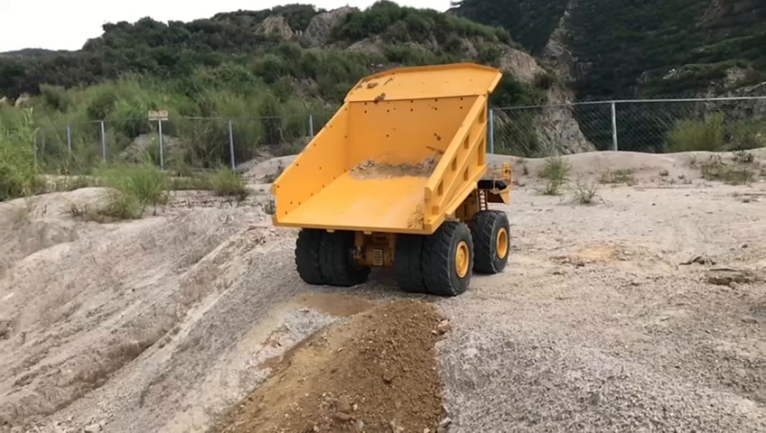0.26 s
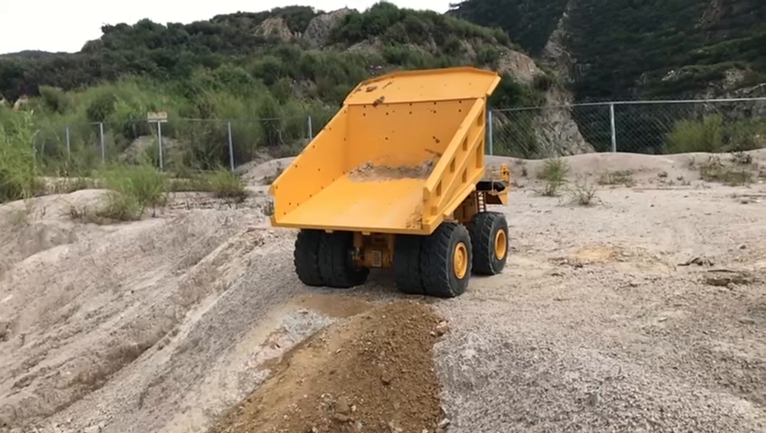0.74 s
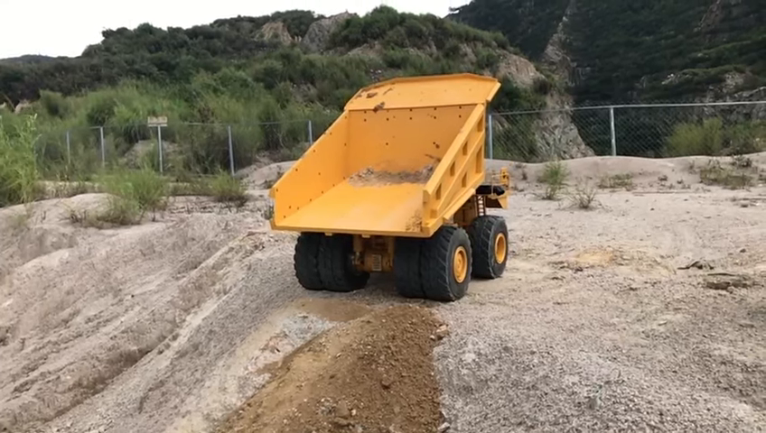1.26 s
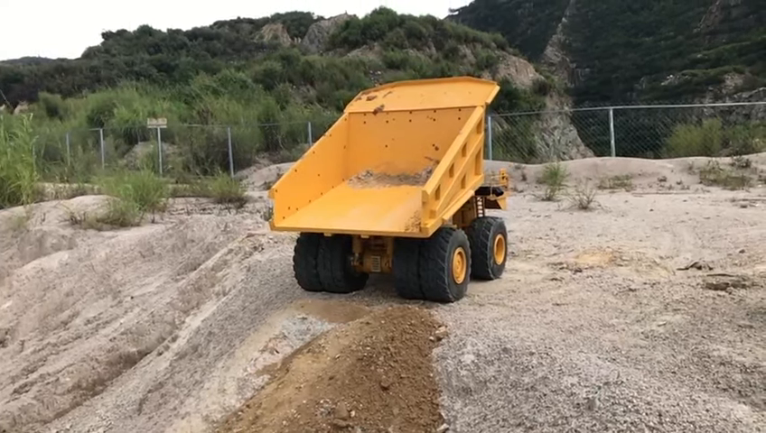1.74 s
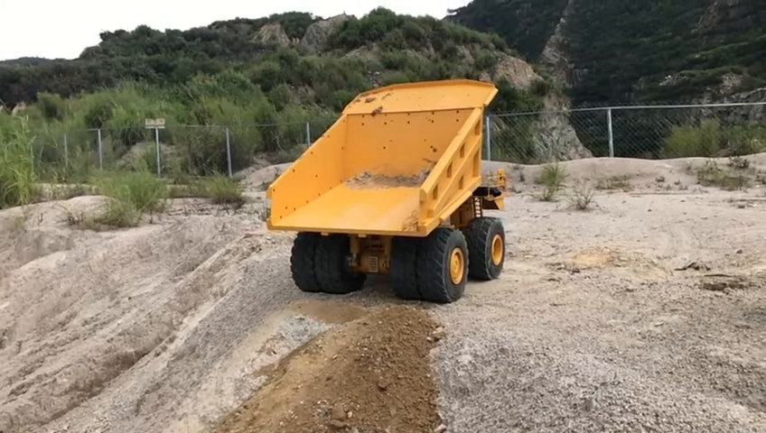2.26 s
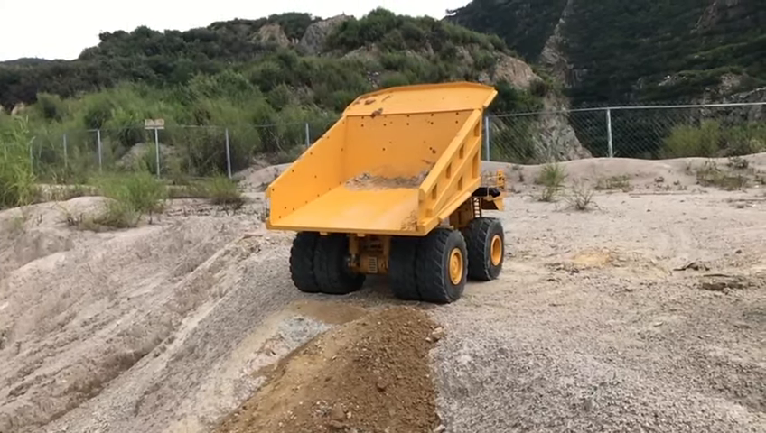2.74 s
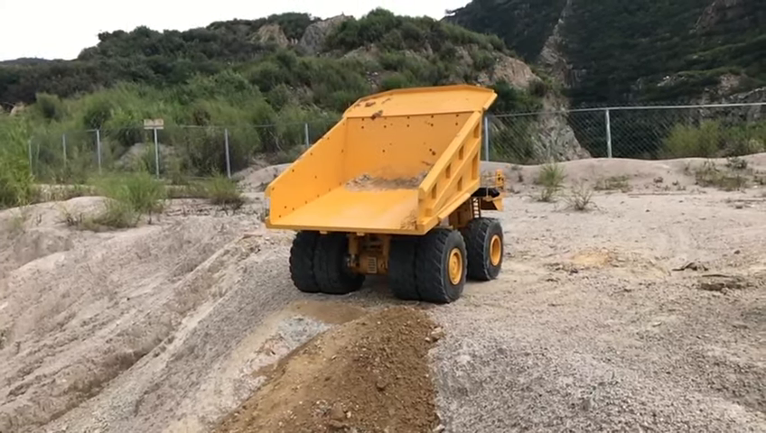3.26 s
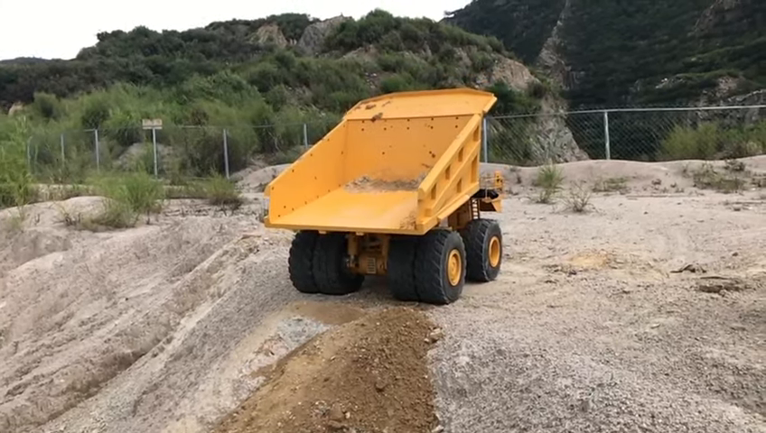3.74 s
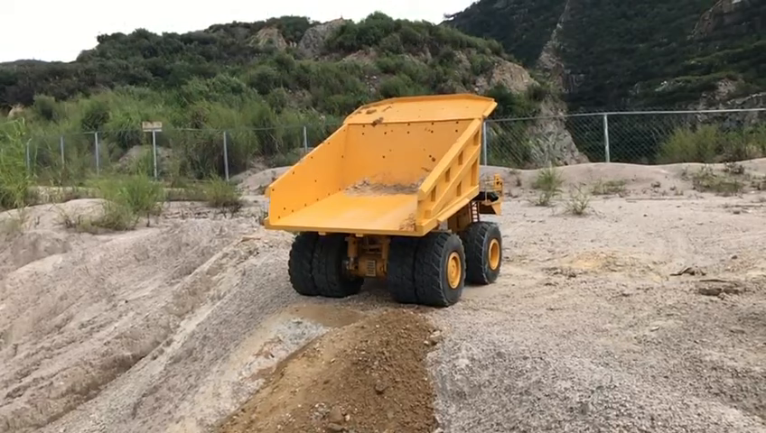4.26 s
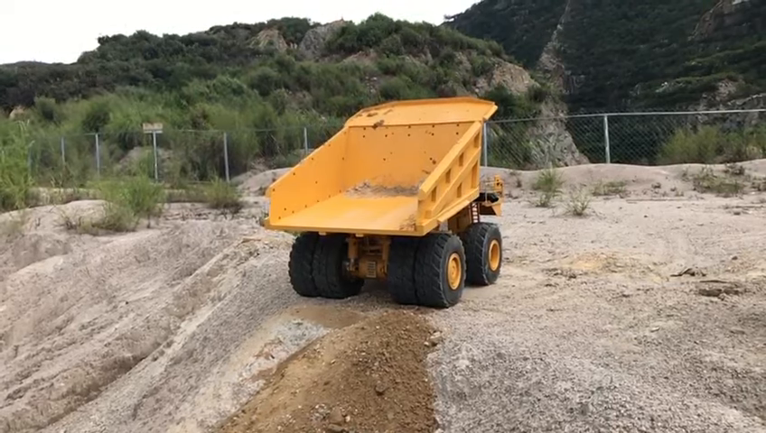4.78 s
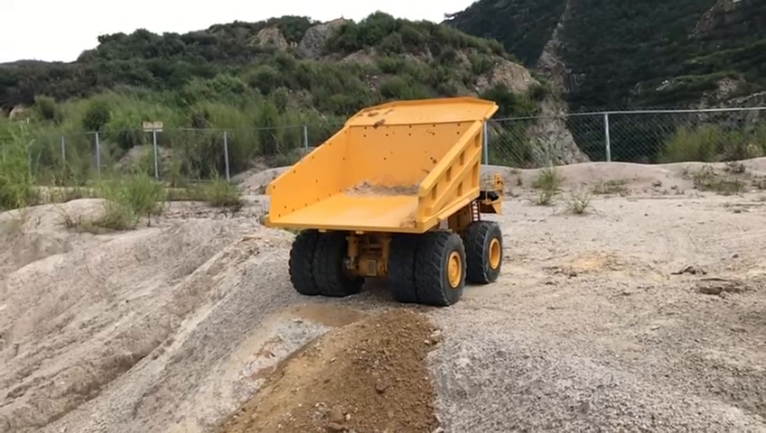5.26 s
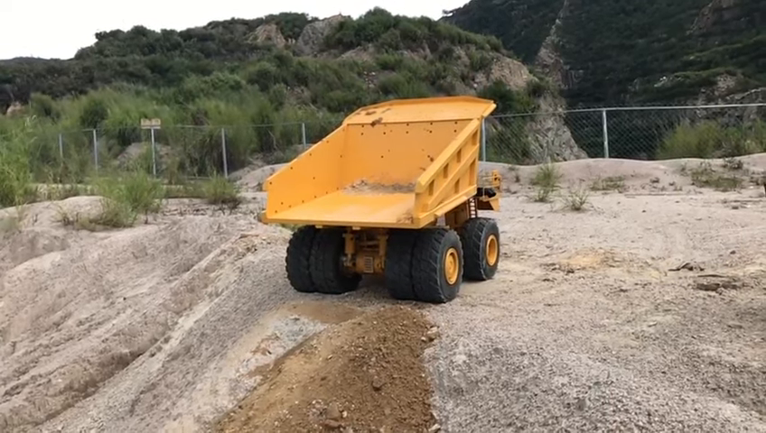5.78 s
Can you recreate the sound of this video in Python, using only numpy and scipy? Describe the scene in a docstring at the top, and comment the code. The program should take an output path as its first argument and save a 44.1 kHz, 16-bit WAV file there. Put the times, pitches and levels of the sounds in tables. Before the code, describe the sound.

A model tipper truck's little pump motor hums and whines continuously under low, lumpy wind buffeting, with faint oil hiss and piercing electronic whistle.

```python
"""A small brushless motor drives the hydraulic pump of a model tipper truck outdoors while the bed sinks.
The motor is a set of sines locked to the shaft, with noise ringing in the housing once a turn and a
faint stray tone. The speed controller is a wavering high sine with sidebands, the oil in the valve is
shaped noise, and the wind on the bare microphone is low noise with short thumps of falling pitch."""
import sys
import numpy as np
from scipy import signal
from scipy.io import wavfile
from scipy.ndimage import uniform_filter1d

SR = 44100
rng = np.random.default_rng(int(sys.argv[2]) if len(sys.argv) > 2 else 0)


def unload_wav(signal):
    """Save mono or channel-first audio to the path in sys.argv[1] as 16-bit WAV at rate SR, clipped to [-1, 1]."""
    wavfile.write(
        sys.argv[1],
        SR,
        np.round(np.clip(np.atleast_2d(signal).T, -1, 1) * 32767).astype(np.int16),
    )


N = 265217
T = np.arange(N) / SR
COARSE = T[::256]  # s, sparse times for slow changes


def gain_of(db):
    """Decibels to a factor."""
    return 10 ** (np.asarray(db) / 20)


def evened(x):
    """Scales to rms 1."""
    return x / np.sqrt(np.mean(x ** 2) + 1e-20)


def curve(rows):
    """Joins (s, value) rows by straight lines."""
    return np.interp(T, *np.transpose(rows))


def drift(top_hz, span=20, t=T):
    """Slow chance of rms 1 between top_hz / span and top_hz, read at times t."""
    hz = np.geomspace(top_hz / span, top_hz, num=16)[:, None]
    start = rng.random(hz.shape)
    waves = np.sin(2 * np.pi * (hz * COARSE + start)) / np.sqrt(hz)
    return np.interp(t, COARSE, evened(waves.sum(0)))


def noise(spectrum, patchy_db, size=1024):
    """Random short-time spectra with drifting patches, rms 1; spectrum rows are Hz and relative dB."""
    bins_hz = np.fft.rfftfreq(size, 1 / SR)
    frames = N * 4 // size + 5
    real, imag, patches = rng.standard_normal((frames, len(bins_hz), 3)).T
    patches = uniform_filter1d(patches, size=10, axis=0)
    patches = evened(uniform_filter1d(patches, size=10, axis=1))
    hz, db = np.transpose(spectrum)
    shape_db = np.interp(np.log(bins_hz + 1), np.log(hz), db)[:, None]
    spectra = (real + 1j * imag) * gain_of(shape_db + patchy_db * patches)
    return evened(signal.istft(spectra, nperseg=size, noverlap=size * 3 // 4)[1][:N])


def plateau(span, ramp_s):
    """Rises to 1 at the start of the span and falls back at its end."""
    from_edge_s = np.minimum(COARSE - span[0], span[1] - COARSE)
    return np.clip(from_edge_s / ramp_s + .5, 0, 1)


def rumble():
    """Wind turbulence on the microphone: low noise whose level is lumpy."""
    # Wind strength. Each row: time in seconds, level in dB.
    wind_level = [(0.0, -33), (0.48, -37), (0.58, -37), (0.8, -37.5), (1.42, -44), (1.94, -43), (2.18, -46),
                  (2.61, -42), (3.13, -46.5), (3.25, -49), (3.35, -43.5), (3.55, -48), (3.8, -47),
                  (4.13, -47), (4.79, -48), (5.09, -40), (5.37, -46), (6.01, -49)]
    # Rumble through the microphone's low cut. Each row: frequency in Hz, relative level in dB per Hz.
    rumble_spectrum = [(15, -62), (25, -35), (40, -3.5), (60, 7), (90, -10.5), (140, -8), (250, -23),
                       (400, -33.5), (700, -79), (1500, -110)]
    level_db = curve(wind_level) + 3.04 * drift(80) + 0.4 * drift(9.8, span=4)
    return gain_of(level_db) * noise(rumble_spectrum, patchy_db=1.07, size=2048)


def eddies():
    """Single eddies hit the microphone; their pitch falls because the low cut delays the deepest part."""
    # Each row: centre in seconds, peak level in dB, pitch at the centre in Hz, length in ms,
    # level of the rough edge in dB (levels as they stand before the capsule rounds them).
    thumps = [(0.023, -26, 98, 6.4, -33.5), (0.092, -23, 113, 10.4, -30), (0.126, -40, 150, 31.5, -23.5),
              (0.162, -18, 112, 22.5, -25.5), (0.184, -27.5, 132, 28, -27), (0.225, -28, 79, 8.3, -40),
              (0.298, -34, 65.6, 13, -48), (0.419, -23.5, 86, 38, -45), (0.473, -27, 79, 12, -40.5),
              (0.508, -21.5, 89.3, 9.7, -30.5), (0.618, -33, 70, 28, -45), (0.673, -23.5, 69.4, 17, -46),
              (0.698, -27, 53.7, 44, -47.5), (0.855, -26.5, 82, 36, -35.5), (0.982, -26, 77.4, 20, -36),
              (1.315, -33, 87, 24, -45), (1.367, -18, 73, 20, -29.5), (1.41, -28, 80, 19, -62),
              (1.523, -26.5, 82, 15, -49), (1.69, -25, 68.6, 8.2, -48), (1.815, -22.5, 78.5, 20, -29.5),
              (1.843, -20.5, 96, 10.6, -38), (2.055, -30, 81, 16, -58), (2.09, -30, 68, 33, -54),
              (2.42, -26.5, 84, 15, -47.5), (2.547, -33.5, 75.6, 22, -51.5), (2.905, -35, 60, 23, -52),
              (3.135, -32, 56.5, 34, -60), (3.29, -30.5, 65.4, 23, -52), (3.335, -35, 60, 20, -55),
              (3.393, -29.5, 83.4, 14, -50), (3.499, -17.5, 73.6, 13, -40), (3.994, -26, 101, 22, -43),
              (4.063, -33, 63, 27, -53.5), (4.227, -32.5, 65, 27, -57), (4.461, -28, 65.6, 50, -59),
              (4.616, -26.5, 79, 12, -52), (4.714, -35, 70, 18, -52), (4.859, -19.5, 91, 19.5, -36),
              (5.016, -16, 70, 15.4, -32), (5.091, -23, 109, 12, -41), (5.163, -29.5, 90, 19, -40.5),
              (5.203, -34, 94, 26, -44), (5.63, -38.5, 65, 30, -53)]
    # Rough leading edge of an eddy. Each row: frequency in Hz, relative level in dB per Hz.
    edge_spectrum = [(60, -33), (120, -1), (170, 3.5), (250, -2), (320, -17), (450, -25.5), (700, -40),
                     (1500, -110)]
    rough = noise(edge_spectrum, patchy_db=4.0, size=2048)
    start_phases = rng.uniform(-0.81, 1.0, len(thumps))
    out = np.zeros(N)
    for (s, db, hz, ms, edge_db), phase in zip(thumps, start_phases):
        near = slice(max(round((s - .2) * SR), 0), round((s + .2) * SR))
        u = (T[near] - s) / (ms / 1000)  # time from the centre, in lengths
        turns = np.cumsum(hz * np.exp(-.45 * np.tanh(u))) / SR
        turns -= np.interp(0, u, turns)  # count cycles from the centre
        out[near] += gain_of(db - 21.0 * u ** 2) * np.cos(2 * np.pi * turns + phase)
        # the rough edge peaks a little ahead of the thump
        out[near] += gain_of(edge_db - 20.0 * (u + 0.16) ** 2) * rough[near]
    return out


def wind():
    """Rumble and eddies together; the capsule rounds off the hardest blows."""
    return .22 * np.tanh((rumble() + eddies()) / .22)


def hiss():
    """Oil through the valve and open air: smooth broad noise with a slight swell."""
    # Each row: frequency in Hz, relative level in dB per Hz.
    hiss_spectrum = [(150, -14), (300, 4), (450, -3.5), (900, -1.5), (1400, -0.5), (2000, -2), (3000, -4.5),
                     (4700, -7), (5600, -4.5), (7600, -8), (9300, -5.5), (10200, -15.5), (11000, -11),
                     (15500, -13.5)]
    # Comes up at first, then holds. Each row: time in seconds, level in dB.
    hiss_level = [(0, -54), (.3, -52.5), (2, -51.5), (6.01, -51.5)]
    level_db = curve(hiss_level) + 0.42 * drift(9.8)
    return gain_of(level_db) * noise(hiss_spectrum, patchy_db=1.22)


def shaft_turns():
    """Turns of the motor shaft so far, summed from its speed."""
    # Steady, then a step and a slow climb as the load eases.
    # Each row: time in seconds, shaft speed in turns per second.
    speed = [(0.0, 42.4), (0.3, 42.43), (0.7, 42.544), (3.02, 42.543), (3.25, 42.776), (3.75, 42.91),
             (4.4, 42.895), (4.88, 43.0), (5.25, 43.15), (6.04, 43.09)]
    return np.cumsum(curve(speed)) / SR


def tones(rows, base_turns, episode_db, spread, waver_db, wobble):
    """Sines locked to the shaft; levels follow the bed and waver, and phases wobble, each on its own."""
    # How far the bed has sunk. Each row: time in seconds, position from 0 raised to 1 low.
    bed_rows = [(2.6, 0.065), (3.3, 0.56), (4.6, 0.77), (5.1, 1)]
    bed = np.interp(COARSE, *np.transpose(bed_rows))
    turns = shaft_turns()
    # all come up to full strength, high multiples from lower down
    warm_db, warm_s, warm_multiple = -5.5, 0.75, 37
    warming_db = warm_db * np.clip(1 - COARSE / warm_s, 0, 1)
    out = np.zeros(N)
    for k, raised_db, low_db in rows:
        db = raised_db + (low_db - raised_db) * bed
        db = db + warming_db * min(abs(k) / warm_multiple, 1) + episode_db(k)
        level = np.sqrt(2) * gain_of(db + waver_db * drift(10, span=5.3, t=COARSE))
        # the square sets groups of multiples at different points of the turn
        offset = spread * k ** 2 + wobble * drift(12, t=COARSE)
        # as the bed sinks they slip out of step
        offset = offset + 2 * bed * rng.standard_normal()
        phase = 2 * np.pi * (base_turns + k * turns) + np.interp(T, COARSE, offset)
        out += np.interp(T, COARSE, level) * np.cos(phase)
    return out


def shift_db(k):
    """Around the change of load, sidebands near the whistle gain level and far ones lose it."""
    near_db, far_db, near_multiple = 8, -4, 38
    change_db = near_db if abs(k) < near_multiple else far_db
    return change_db * plateau((2.36, 3.2), ramp_s=.3)


def controller():
    """A pure switching whistle trembles in the moving air; commutation beats with it into sidebands."""
    switching_hz = 9827.8
    # Swells and fades as the truck's panels move. Each row: time in seconds, level in dB.
    whistle_level = [(0.0, -56.5), (0.5, -54.5), (0.95, -48), (1.34, -50.5), (1.62, -47), (1.92, -47.5),
                     (2.46, -51), (2.68, -55.5), (2.91, -54.5), (3.05, -52), (3.55, -50), (4.1, -46.5),
                     (4.25, -50), (4.45, -49), (4.74, -52.5), (5.07, -52), (5.47, -48.5), (6.01, -46)]
    # Each row: shaft multiples off the whistle, level in dB with the bed raised, level in dB with it low.
    sidebands = [(-84, -70.5, -82), (-63, -76.5, -84), (-42, -63, -68), (-35, -81, -87), (-28, -80, -86),
                 (-7, -78, -84), (35, -84, -96), (42, -82, -84)]
    level_db = curve(whistle_level) + 0.79 * drift(55, span=5.5) + 0.65 * drift(8, span=3)
    phase = 2 * np.pi * switching_hz * T + 0.23 * drift(110)
    whistle = np.sqrt(2) * gain_of(level_db) * np.cos(phase)
    return whistle + tones(sidebands, switching_hz * T, shift_db, spread=.1, waver_db=1.2, wobble=.2)


def stray_tone():
    """A faint wavering tone that ignores the shaft speed."""
    stray_hz, stray_db = 1229, -66.5
    level = np.sqrt(2) * gain_of(stray_db + 1.85 * drift(12, span=6))
    return level * np.cos(2 * np.pi * stray_hz * T + 1.3 * drift(9))


def housing_rattle():
    """Housing resonances ring with noise that throbs once a turn."""
    # Each row: resonance in Hz, width in Hz, level in dB.
    resonances = [(663, 55, -64.5), (1622, 100, -61.5), (1813, 48, -67), (2506, 290, -66)]
    throb = 1 + 0.49 * np.cos(2 * np.pi * shaft_turns())
    out = np.zeros(N)
    for hz, width, db in resonances:
        r = np.exp(-np.pi * width / SR)
        grain = rng.standard_normal(N) + 1j * rng.standard_normal(N)
        slow = signal.lfilter([1 - r], [1, -r], throb * grain)
        ringing = (slow * np.exp(2j * np.pi * hz * T)).real  # slow noise moved up to the resonance
        out += gain_of(db + 0.84 * drift(1.9)) * evened(ringing)
    return out


def handover_db(k):
    """For a while one strong housing tone hands over to its upper neighbour."""
    swap_db = {37: -9, 38: 6}.get(k, 0)  # shaft multiple: change in dB
    return swap_db * plateau((3, 4.85), ramp_s=0.71)


def pump():
    """Motor and pump: neighbouring shaft harmonics beat once a turn, over the rattle and the stray tone."""
    # Each row: multiple of the shaft speed, level in dB with the bed raised, level in dB with it low.
    harmonics = [(12, -66.5, -66), (14, -64, -59.5), (15, -56, -59), (16, -66, -67), (22, -76, -82),
                 (24, -76, -81), (28, -78, -72), (31, -74, -79), (32, -80, -73), (35, -76, -72),
                 (36, -61.5, -60.5), (37, -57, -57), (38, -65, -66), (39, -68, -71), (42, -63.5, -60),
                 (43, -75, -72), (44, -74, -76), (45, -71, -84), (48, -71.5, -75), (49, -76, -78),
                 (50, -74, -80), (56, -72.5, -78), (57, -74, -90), (59, -74.5, -81), (60, -77, -80),
                 (61, -88, -73), (62, -77, -90), (84, -69.5, -83), (105, -72, -88), (210, -71, -77)]
    buzz = tones(harmonics, 0, handover_db, spread=np.pi / 100, waver_db=.8, wobble=.2)
    return housing_rattle() + stray_tone() + buzz


def scene():
    """All sources at one microphone."""
    return (wind() + hiss() + controller() + pump())[None]


def record(dry):
    """The microphone's low cut, then the band limit."""
    edge_hz = 15730
    low_cut = signal.butter(N=3, Wn=32, btype="high", fs=SR, output="sos")
    cut = signal.sosfilt(low_cut, dry)
    band_limit = signal.firwin(1023, edge_hz, window=("kaiser", 10), fs=SR)
    return signal.oaconvolve(cut, band_limit[None], "same")


dry = scene()
out = record(dry)
unload_wav(out)
```